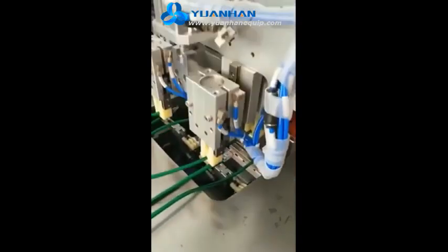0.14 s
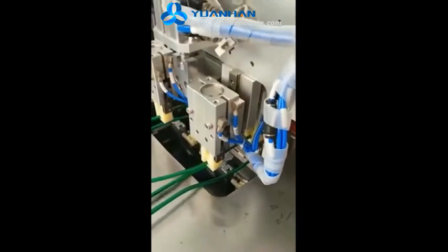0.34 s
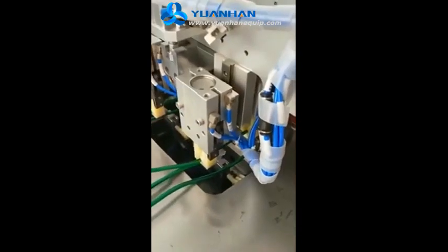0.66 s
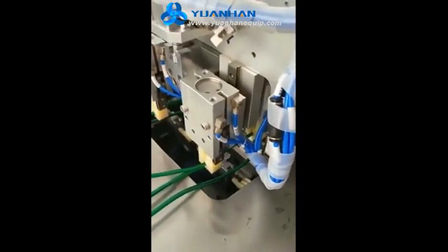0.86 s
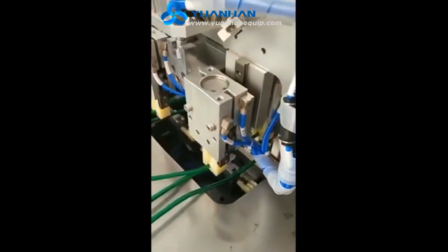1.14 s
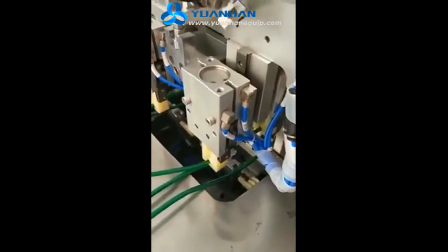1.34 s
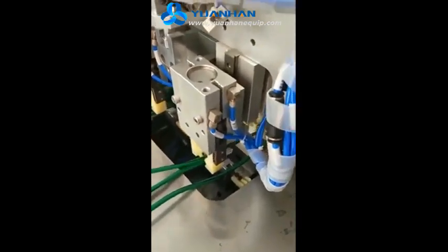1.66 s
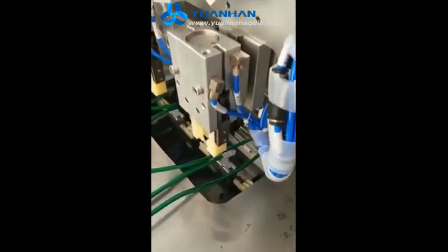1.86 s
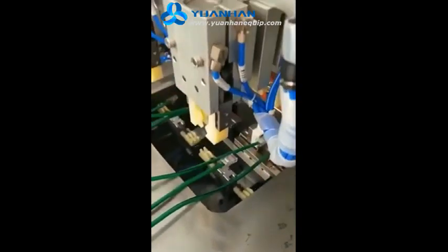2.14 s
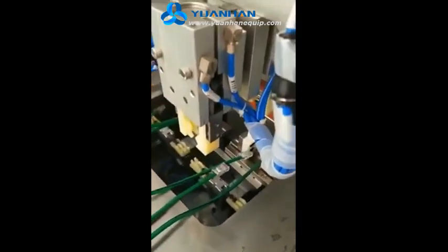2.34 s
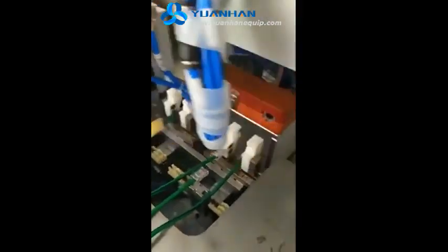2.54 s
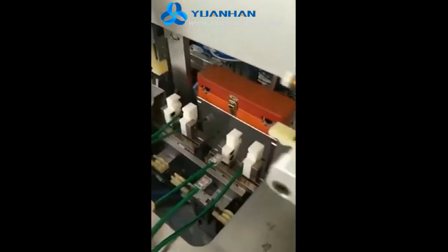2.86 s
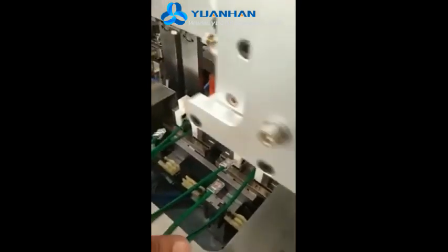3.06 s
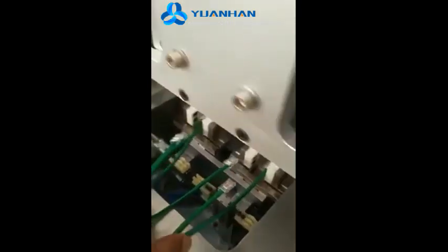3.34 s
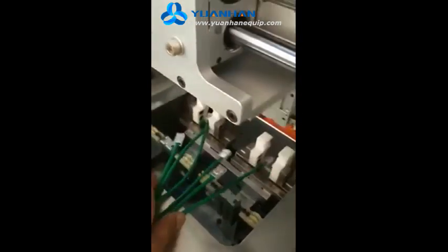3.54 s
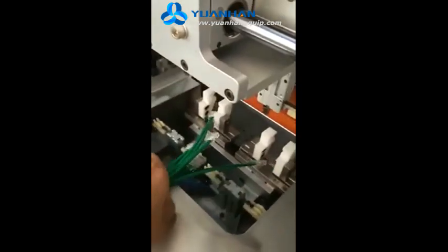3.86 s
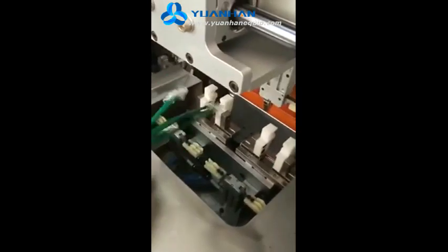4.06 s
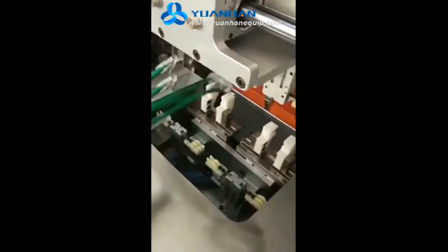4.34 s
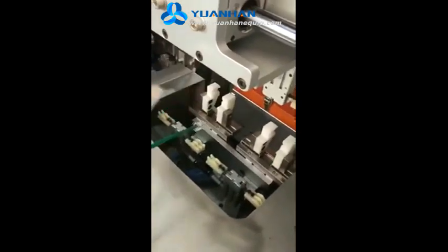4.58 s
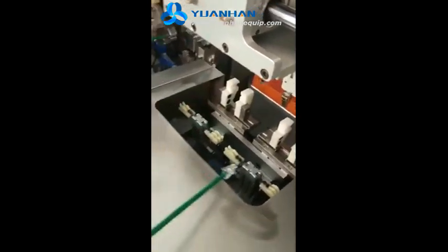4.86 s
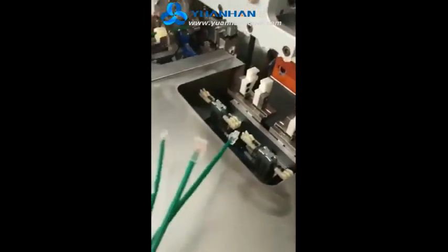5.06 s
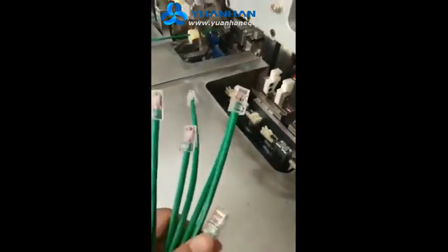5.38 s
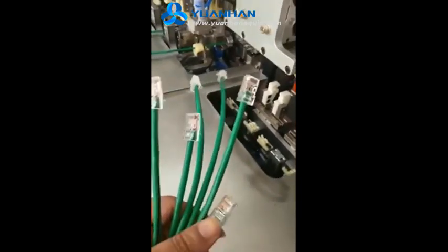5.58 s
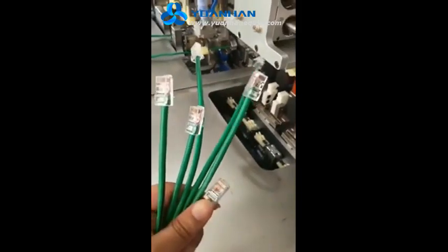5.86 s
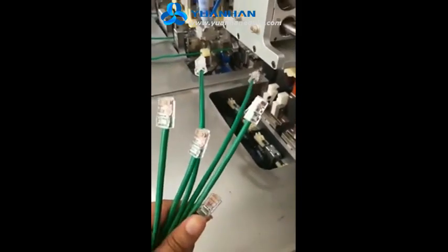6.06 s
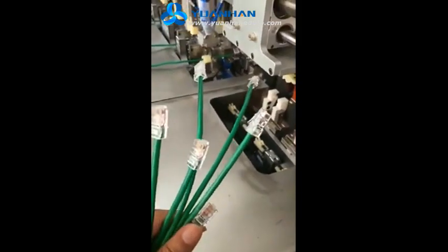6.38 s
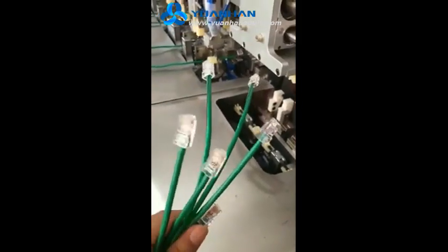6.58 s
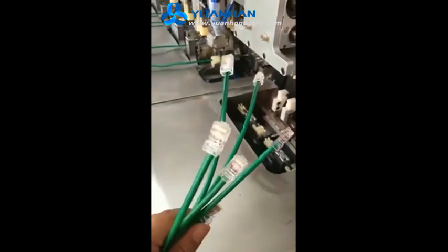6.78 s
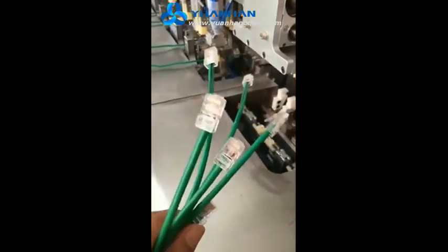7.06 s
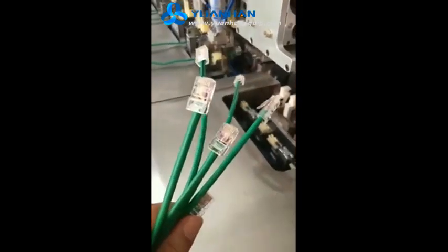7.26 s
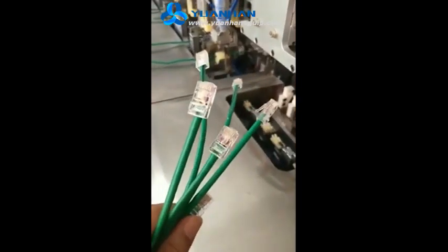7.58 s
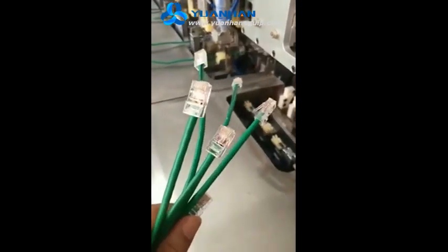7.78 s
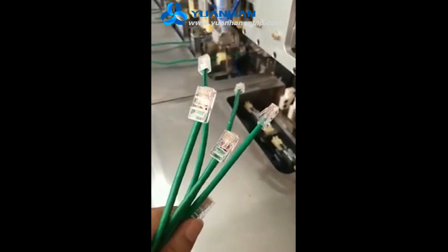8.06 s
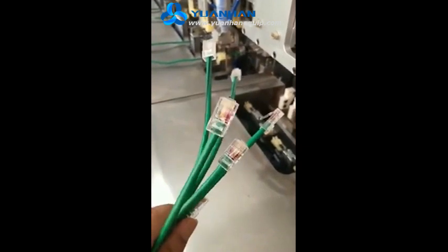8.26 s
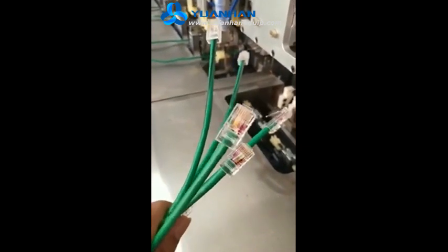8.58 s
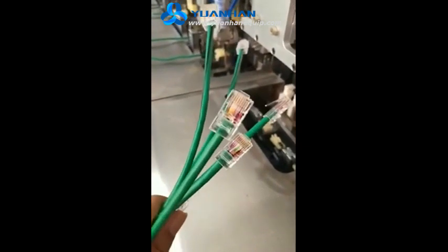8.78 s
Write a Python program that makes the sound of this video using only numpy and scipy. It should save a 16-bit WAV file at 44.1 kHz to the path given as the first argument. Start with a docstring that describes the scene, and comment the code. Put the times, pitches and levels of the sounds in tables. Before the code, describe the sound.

Steady factory din with faint motor whines and buzzing hum sits behind a near machine handling plug-ended cables. Cylinders hit their stops with dull low thuds, jaws and valves clack with airy bursts, steel contacts tick, and slides rumble through the metal frame. Activity thickens from about two to six seconds, thins out, then bursts again near eight. Close handheld microphone, short reverberation, loud peaks softly squeezed.

```python
"""A factory hall with an automated cable assembly line, heard from close by.
Mains hum is a wavering sine; the din is shaped noise with narrow motor whines; loose parts rattle in tiny rings.
A carriage drives noise through the resonances of the steel frame as it travels, and jolts over joints.
Cylinders thud as decaying tones, jaws and valves clack as noise bursts with steel modes and tick as bare
contacts, hollow knocks and squeaks are short rough tones; the hall answers the near sounds with a noise tail."""
import sys
import numpy as np
from scipy import signal
from scipy.fft import rfft, irfft, next_fast_len
from scipy.io import wavfile
from scipy.ndimage import uniform_filter1d, map_coordinates

SR = 44100
rng = np.random.default_rng(int(sys.argv[2]) if len(sys.argv) > 2 else 0)


def unload_audio(sound):
    """Save the sound as a 16-bit wav file, at the path given as the first command line argument."""
    columns = np.transpose(np.atleast_2d(sound))
    # keep every value between -1 and 1, then stretch to whole-number steps
    steps = np.round(np.clip(columns, -1, 1) * 32767)
    wavfile.write(sys.argv[1], SR, steps.astype(np.int16))


N = 393372

# loudness of the hall din, which the rattles follow: (time [s], level [dB])
DIN_LEVEL = [(0, -29.5), (.55, -31), (1.9, -31.5), (2.13, -28), (2.68, -26.5), (2.9, -29.5), (4.02, -31),
             (4.08, -36), (4.25, -33), (4.7, -28), (5.4, -32), (5.9, -31), (7.1, -32), (8.8, -32.5),
             (8.92, -27.5)]


def amp(db):
    """Gain of a level in dB."""
    return 10 ** (np.asarray(db) / 20)


def unit(x):
    """x scaled to an RMS of 1."""
    return x / np.sqrt(np.mean(x ** 2) + 1e-20)


def along(points, hz):
    """Read (frequency [Hz], value) points at hz, on a log frequency axis."""
    f, v = np.transpose(points)
    return np.interp(np.log(hz + 1), np.log(f + 1), v)


def curves(rows):
    """One value per sample for each column after the time."""
    s, *cols = np.transpose(rows)
    return [np.interp(np.arange(N) / SR, s, c) for c in cols]


def wobble(rate):
    """A smooth random curve, rate knots a second."""
    knots = rng.standard_normal(int(N * rate / SR) + 4)
    return map_coordinates(knots, [np.arange(N) * rate / SR])


def filtered(x, response):
    """x times a complex response of frequency."""
    m = next_fast_len(x.shape[-1] + 8192)
    spectrum = rfft(x, m) * response(np.fft.rfftfreq(m, 1 / SR))
    return irfft(spectrum, m)[..., :x.shape[-1]]


def resonance(f, hz, width):
    """One causal resonance, gain 1 at its centre."""
    return 1j * f * width / (hz * hz - f * f + 1j * f * width)


def patchy(patchy_db, tall, long):
    """White noise with patches of random gain, tall bins by long frames."""
    z = signal.stft(rng.standard_normal(N), nperseg=512)[2]
    field = uniform_filter1d(rng.standard_normal(z.shape), size=tall, axis=0)
    field = uniform_filter1d(field, size=long, axis=1)
    return signal.istft(z * amp(patchy_db * unit(field)), nperseg=512)[1][:N]


def add(track, s, sound):
    """Mix a sound into the track from time s."""
    part = track[round(s * SR):][:len(sound)]
    part += sound[:len(part)]


def hum():
    """Transformers and motors buzz at twice the mains frequency, a little unsteady."""
    # buzz loudness: (time [s], level [dB])
    hum_level = [(0, -30.5), (8.92, -32)]
    phase = 2 * np.pi * 99.5 * np.arange(N) / SR + .4 * wobble(8)
    return amp(curves(hum_level)[0] + 1.2 * wobble(10)) * np.sin(phase)


def din():
    """Far machines and air leaks blend to a fluttering roar; far motors add narrow-band whines."""
    # tone of the roar: (frequency [Hz], relative level [dB per Hz])
    hall_tone = [(18, -63.5), (30, -19.5), (69, -4.5), (81, -12.5), (100, -10), (127, -12), (559, -23),
                 (705, -17.5), (849, -15), (1050, -22), (1230, -29.5), (1780, -21), (2200, -14.5),
                 (4210, -16.5), (7700, -24), (10000, -62), (16900, -120)]
    # narrow whines of far motors: (frequency [Hz], width [Hz], level [dB])
    motor_whines = [(1011, 26, -46.5), (1197, 110, -44), (1807, 24, -48), (2080, 25, -49.5)]
    level_db, = curves(DIN_LEVEL)
    broad = patchy(patchy_db=2.5, tall=14, long=9)
    fine = patchy(patchy_db=3.6, tall=2, long=4)
    flutter = amp(1.33 * wobble(9) + 0.97 * wobble(27))
    roar = (unit(broad) + amp(9.0) * unit(fine)) * flutter
    whine = np.zeros(N)
    for hz, width, db in motor_whines:
        noise = rng.standard_normal(N)
        whine += amp(db) * unit(filtered(noise, lambda f: resonance(f, hz, width) ** 2))
    return amp(level_db) * unit(filtered(roar, lambda hz: amp(along(hall_tone, hz)))) + whine


def rattles():
    """Loose parts all over the line ring briefly at random; their level clumps and follows the din."""
    per_second, level_vs_din_db, size_range_db = 260, -9, 9
    middle_hz, t60_cycles = 2600, 35
    level_db, = curves(DIN_LEVEL)
    track, t = np.zeros(N), np.arange(SR // 20) / SR
    clumps_db = 2.5 * wobble(7)
    for when, pitch, size in rng.random((int(per_second * N / SR), 3)):
        hz = middle_hz * 9 ** (pitch - .5)  # a third to three times the middle pitch
        decay = amp(-60 * t * hz / t60_cycles)
        ring = decay * (1 - np.exp(-t / 0.0032)) * np.sin(2 * np.pi * hz * t)
        add(track, when * N / SR, amp(-size_range_db * size) * ring)
    return amp(level_db + level_vs_din_db) * unit(track * amp(np.minimum(clumps_db, 5)))


def effort():
    """Rumble and deep shake gains: every move rises, drifts from its first to its last level and settles."""
    # the line at rest: (time [s], rumble [dB], deep shake [dB])
    idle = [(0, -34, -37), (1.6, -31.5, -45), (5.5, -27.5, -28.5), (6.75, -29, -36.5), (7.6, -26.5, -36.5),
            (8.08, -28.5, -33.5), (8.92, -28.5, -38)]
    # slide and carriage moves:
    # (time [s], length [s], rumble at the start [dB], rumble at the end [dB], deep shake [dB])
    moves = [(1.033, 0.39, -25, -25, -30), (1.777, 0.88, -19.5, -17.5, -20.5),
             (2.707, 0.76, -21, -18, -22.5), (3.42, 0.54, -22, -15.5, -22.5),
             (4.168, 0.65, -24.5, -16.5, -25), (4.887, 0.48, -19, -17.5, -27),
             (5.635, 0.4, -21.5, -24.5, -37.5), (6.399, 0.089, -24.5, -19, -33.5),
             (7.243, 0.26, -24, -29, -36.5), (8.115, .2, -21.5, -22, -38), (8.576, 0.2, -23, -28.5, -31.5)]
    start_s, sway_s = 0.012, 0.33  # the rumble picks up at once, the shake builds
    brake_db, brake_s = 3, 0.039  # quick first drop as a move stops
    settle_db_per_s = 32.5  # then the frame settles
    t = np.arange(N) / SR
    rumble_power, shake_power = amp(curves(idle)) ** 2
    for s, length, first_db, last_db, deep_db in moves:
        after = np.maximum(t - s - length, 0)
        settle_db = -settle_db_per_s * after - brake_db * (1 - np.exp(-after / brake_s))
        level_db = np.interp(t, [s, s + length], [first_db, last_db])
        rumble_rise = np.clip((t - s) / start_s, 0, 1)
        shake_rise = np.clip((t - s) / sway_s, 0, 1)
        rumble_power = rumble_power + (amp(level_db + settle_db) * rumble_rise) ** 2
        shake_power = shake_power + (amp(deep_db + settle_db) * shake_rise) ** 2
    return np.sqrt(rumble_power), np.sqrt(shake_power)


def carriage():
    """Rollers on the rails feed uneven pushes into the frame's resonances, over a deep random shake."""
    # resonances of the steel frame: (frequency [Hz], width [Hz], level [dB])
    frame_modes = [(141.6, 48.3, -4.5), (182.3, 28.3, 0), (240.4, 26.3, 0), (321, 73.6, -3),
                   (396.4, 167, -6.5), (584, 207, -9.5), (840, 476, -17)]
    # tone of the deep shake: (frequency [Hz], relative level [dB per Hz])
    shake_tone = [(20, -36.5), (45, -19), (65, -16), (82, 2), (110, -4.5), (150, -4.5), (250, -56.5)]
    surge_db, lurch_db = .6, 1.5  # random swings of the rumble and of the deep shake
    rumble_gain, shake_gain = effort()

    def steel(f):
        """Frame modes side by side, in alternating polarity."""
        return sum((-1) ** k * amp(db) * resonance(f, hz, width)
                   for k, (hz, width, db) in enumerate(frame_modes))

    pushes = patchy(patchy_db=1.25, tall=2, long=6) * amp(1.1 * wobble(40) + surge_db * wobble(12))
    deep = rng.standard_normal(N) * amp(lurch_db * wobble(9))
    shake = unit(filtered(deep, lambda hz: amp(along(shake_tone, hz))))
    return rumble_gain * unit(filtered(pushes, steel)) + shake_gain * shake


def knocks_and_squeaks():
    """Short rough tones: hollow knocks bouncing about 45 times a second, and higher squeaks."""
    # hollow knocks (low pitches) and squeaks: (time [s], length [s], pitch [Hz], level [dB])
    tone_list = [(0, 0.046, 758, -24), (3.402, 0.05, 1060, -20.5), (8.756, 0.085, 4212, -28),
                 (8.765, 0.038, 4600, -25.5), (8.789, 0.053, 773, -16.5), (8.835, 0.093, 3090, -27.5)]
    track = np.zeros(N)
    for s, length, hz, db in tone_list:
        t = np.arange(round(length * SR)) / SR
        pulses = .3 + np.abs(np.cos(np.pi * 45 * t))  # forty-five a second
        phase = 2 * np.pi * hz * t + .035 * np.cumsum(rng.standard_normal(len(t)))
        shape = np.sqrt(np.clip(t / 0.0027, 0, 1) * (1 - t / length))
        add(track, s, amp(db) * shape * pulses * np.sin(phase))
    return track


def jolts():
    """The carriage jolts over a joint: one blunt push into the frame, about one swing."""
    # joints passed: (time [s], peak [dB])
    joint_list = [(2.061, -7.5), (2.275, -6.5), (2.905, -8.5), (3.504, -7.5), (4.777, -8), (4.823, -13),
                  (5.067, -10.5), (5.286, -6), (6.432, -11.5), (6.439, -8), (8.163, -9.5), (8.17, -9)]
    swing_hz = 426
    track, t = np.zeros(N), np.arange(SR // 50) / SR
    swing = np.exp(-t * swing_hz * 1.6) * np.sin(2 * np.pi * swing_hz * t)
    for s, db in joint_list:
        add(track, s - .001, amp(db) * rng.choice([-1, 1]) * swing / swing.max())
    return track


def ticks():
    """A bare steel contact: the crack of first touch under a few cycles of ring."""
    # hard steel contacts: (time [s], ring level [dB], ring [Hz])
    contact_list = [(1.287, -13, 3670), (1.293, -8.5, 1495), (1.2976, -8.5, 3960), (1.6147, -7, 3340),
                    (1.6205, -6.5, 3440), (2.177, -21.5, 1680), (2.939, -13, 1496), (3.314, -11, 1430),
                    (4.007, -7, 4710), (4.006, -5.5, 2420), (4.431, -16, 2490), (4.738, -5.5, 4410),
                    (4.748, -9.5, 4660), (4.762, -6.5, 3260), (5.324, -8.5, 3060), (6.0232, -9.5, 5710),
                    (8.134, -12, 2180), (8.14, -8, 4520), (8.149, -12, 3220)]
    t60_cycles, crack_db = 12, -5
    track, t = np.zeros(N), np.arange(SR // 50) / SR
    for s, db, hz in contact_list:
        crack = amp(crack_db - 60 * t / .006) * rng.standard_normal(len(t))
        ring = amp(-60 * t * hz / t60_cycles) * np.sin(2 * np.pi * hz * t)
        add(track, s, amp(db) * (ring + crack))
    return track


def thuds():
    """A soft heavy blow sets one frame panel ringing, its pitch wavering, over a dull puff."""
    # cylinders reaching their stops: (time [s], level [dB], ring [Hz], decay t60 [s])
    stop_list = [(.818,-25,73.3,0.36),(1.068,-3,224.4,0.16),(1.103,-7,242.4,0.21),(1.701,-17,82,0.18),(1.795,-6.5,191,0.14),(1.858,-12,287,0.15),(2.217,-11,244.4,0.15),(2.598,-14,205,0.22),(3.221,-14.5,130.3,0.2),(3.48,-11,237,0.2),(3.61,-19.5,126.7,0.45),(3.69,-8,248.6,.1),(3.695,-14.5,1020,.12),(3.715,-8,191,0.17),(3.85,-9,160,0.12),(3.872,-13,763,.07),(3.92,-10.5,197.4,.1),(3.974,-5.5,232,0.13),(4.294,-18,222,0.5),(4.462,-14.5,237.7,0.21),(4.931,-13.5,231,0.25),(5.016,-11.5,84.7,0.31),(5.299,-15.5,143.1,0.52),(5.572,-11.5,238,0.064),(5.649,-17,189,0.32),(5.672,-10.5,385,0.086),(5.885,-17,250,.15),(6.009,-10.5,136,0.074),(6.405,-20,214.5,0.18),(6.428,-14,509,0.1),(6.79,-23,168.4,0.3),(7.05,-22.5,456,0.18),(7.159,-17,178,0.13),(7.243,-21,334.5,0.2),(7.332,-19,185,0.11),(8.132,-10.5,331,0.07),(8.158,-15.5,514,0.12),(8.161,-13.5,240,.1),(8.192,-15,178,0.14),(8.328,-8.5,199,0.07),(8.574,-23,342,0.18),(8.605,-18.5,578,.1)]
    hold = 1.31  # over 1: a panel rings on a moment before it is damped
    puff_db = -19
    track, t = np.zeros(N), np.arange(SR // 2) / SR
    swell = 1 - np.exp(-t / .009)  # the cushioned piston loads the stop gradually
    for s, db, hz, t60 in stop_list:
        shape = amp(-60 * (t / np.clip(t60, .05, .9)) ** hold) * swell
        drift = np.cumsum(rng.standard_normal(len(t))) * hz / 24000
        noise = rng.standard_normal(len(t))
        puff = unit(filtered(noise, lambda f: resonance(f, 2 * hz, 560) ** 2))
        ring = np.sin(2 * np.pi * hz * t + drift)
        add(track, s - .004, amp(db) * shape * (ring + amp(puff_db) * puff))
    return track


def clacks():
    """Each closing is a swelling burst of contacts and air, coloured by its own band, and rings the jaws."""
    # jaws and valves closing: (time [s], level [dB], own band [Hz], body [dB], treble [dB],
    # time to fall 110 dB [s])
    closing_list = [(.281,-22,1795,7,-13,0.18),(0.813,-12,7620,-6,0,0.21),(1.125,-19,4720,-5.5,-21,0.34),(1.22,-21,3760,-4,-10.5,0.31),(1.288,-11,3710,3.5,-15.5,0.095),(1.438,-22.5,4560,5.5,-7,0.24),(1.614,-22.5,3340,3.5,-8.5,0.11),(1.907,-19,2670,-1,-7,0.19),(2.027,-15,3620,1,-8,0.56),(2.177,-14,2070,6.5,-12,0.1),(2.72,-11.5,5190,6.5,0.5,0.15),(2.9,-13.5,1120,8,-16.5,0.24),(2.94,-26,2480,12.5,5,0.057),(3.315,-21.5,1580,15,-19,0.087),(3.355,-16,2090,-4,-19,.16),(3.607,-27.5,1950,11.5,5,.25),(3.685,-17,2520,11,0.5,0.14),(3.964,-19.5,2740,15.5,-3,0.3),(4.005,-11.5,2530,-3,-7,0.17),(4.293,-19,2510,-14,-1,0.1),(4.43,-22.5,2490,11,-19.5,0.13),(4.503,-19,4860,-0.5,-9,0.094),(4.67,-18,1465,12,-5.5,0.15),(4.736,-10,3470,1.5,-12,0.21),(4.81,-16,3030,3,-19.5,0.15),(5.155,-16,2100,-3.5,-18,0.16),(5.265,-19.5,2410,-3,-4.5,0.15),(5.322,-13.5,3060,0.5,-18,0.27),(5.364,-18.5,2250,-4,-20,0.15),(5.648,-28.5,1440,20,-17.5,0.26),(5.732,-16.5,3480,-3.5,-25,0.2),(5.876,-23.5,2160,5.5,-8.5,0.22),(6.022,-15.5,5000,-1.5,-20.5,0.18),(6.292,-25,3940,-1,-10.5,0.12),(6.39,-21,2150,15,-8.5,0.24),(6.441,-20.5,2470,-9,-3.5,.11),(6.508,-21.5,2740,1,-0.5,0.14),(6.621,-22,2290,-4.5,3,0.16),(6.915,-22.5,2290,1.5,-6,0.2),(7.387,-24,2000,11,-1.5,0.33),(7.749,-28.5,1760,14.5,7.5,0.13),(7.995,-27.5,1950,3.5,-1,0.68),(8.124,-18.5,2610,11.5,-6,0.25),(8.268,-19.5,2220,5,-2.5,0.13),(8.413,-23,4000,-1,0.5,0.097),(8.568,-24,2010,16,0,0.16),(8.757,-17,4240,3.5,-9,0.66)]
    # modes of the steel jaws: (frequency [Hz], level [dB], decay t60 [s])
    jaw_modes = [(1022, -0.5, 0.069), (2103, 0.5, 0.18), (2430, 3, 0.077), (3300, 4.5, 0.14),
                 (4240, 7.5, 0.093), (5180, 7.5, 0.054), (7900, -4.5, 0.044)]
    ring_db = -11
    lead_db, lead_s = -15, .012  # a faint noise swells just before each clack
    track, t = np.zeros(N), np.arange(SR // 2) / SR
    for s, db, hz, body_db, treble_db, fall_s in closing_list:
        fade = (t / np.clip(fall_s, .03, .9)) ** 1.694  # the burst holds a moment before it dies
        swell = 1 - np.exp(-t / (0.0027 + 0.0082 * fall_s))  # long bursts swell more slowly
        shape = amp(-110 * fade) * swell

        def colour(f):
            """Wide and narrow resonance at the own band, with treble and body in opposite polarity."""
            own = amp(-3.5) * resonance(f, hz, 2500) ** 2 + amp(-4) * resonance(f, hz, 350)
            treble = amp(treble_db) * resonance(f, 7060, 6000) ** 2
            body = amp(body_db) * resonance(f, 610, 1300) ** 2
            return own - treble - body

        bounces = uniform_filter1d(rng.standard_normal(len(t)), size=200)
        chatter = amp(2.5 * unit(bounces))  # bouncing contacts
        ring = np.zeros(len(t))
        for mode_hz, mode_db, t60 in jaw_modes:
            decay = amp(mode_db + rng.normal(0, 3) - 60 * t / t60)
            ring += decay * np.sin(2 * np.pi * mode_hz * rng.normal(1, .05) * t)
        lead = amp(db + lead_db) * np.exp((t - .05) / lead_s)[:SR // 20]
        add(track, s - .05, lead * filtered(rng.standard_normal(len(lead)), colour))
        strike = chatter * rng.standard_normal(len(t)) + amp(ring_db) * ring
        add(track, s - .002, amp(db) * shape * filtered(strike, colour))
    return track


def hall(x):
    """Each frequency of the hall's answer dies at its own speed, in a tail of noise."""
    # reverberation: (frequency [Hz], decay t60 [s])
    echo_times = [(200, 0.31), (2000, 0.039), (8000, 0.11)]
    hz, t, z = signal.stft(rng.standard_normal(SR // 2), SR, nperseg=256)
    decay = amp(-60 * t / along(echo_times, hz)[:, None])
    tail = signal.istft(z * decay, SR, nperseg=256)[1]
    late = np.pad(x, (400, 0))  # the answer starts 400 samples late
    return signal.fftconvolve(late, tail / np.linalg.norm(tail))[:N]


def scene():
    """Near sounds with their hall answer, over the carriage, the din and the hum."""
    near = clacks() + ticks() + jolts() + thuds() + knocks_and_squeaks() + rattles()
    return (near + amp(-11.5) * hall(near) + carriage() + din() + hum())[None]


def record(dry):
    """Loud peaks are squeezed softly; very little passes above the band limit."""
    top, hard = .8, 4  # ceiling and sharpness of the squeeze
    top_hz = 7720
    soft = dry / (1 + np.abs(dry / top) ** hard) ** (1 / hard)

    def band(hz):
        """Full level below the limit, a faint sloping remainder above."""
        remainder = amp(-41.5 - 0.0053 * np.abs(hz - top_hz))
        return (hz < top_hz) + remainder * (hz >= top_hz)

    return filtered(soft, band)


dry = scene()
out = record(dry)
unload_audio(out)
```